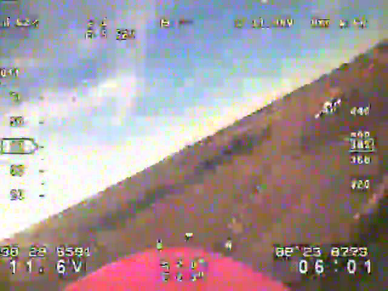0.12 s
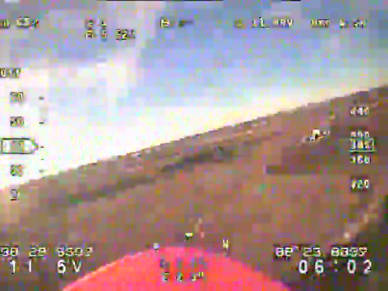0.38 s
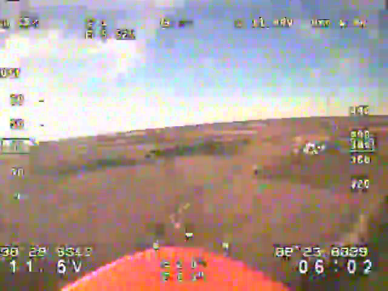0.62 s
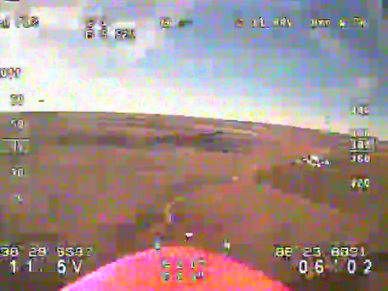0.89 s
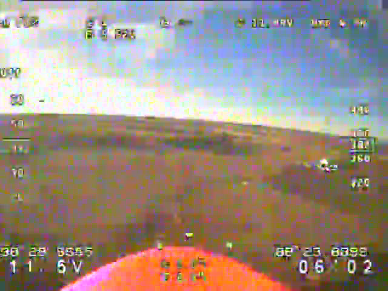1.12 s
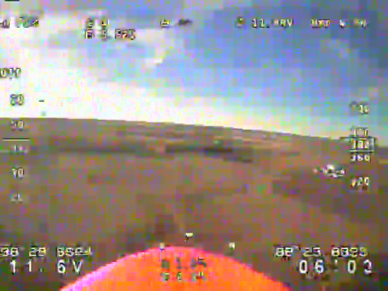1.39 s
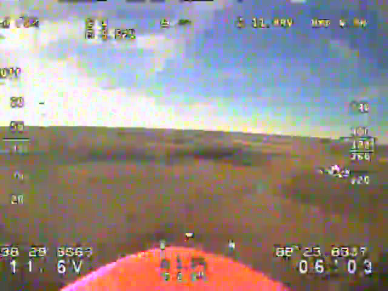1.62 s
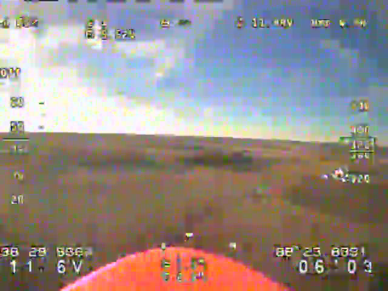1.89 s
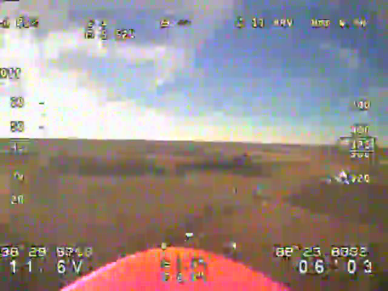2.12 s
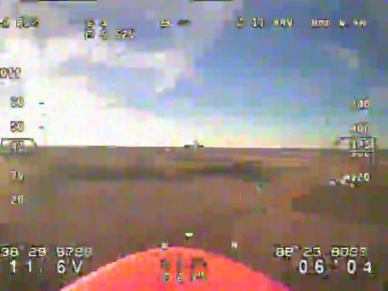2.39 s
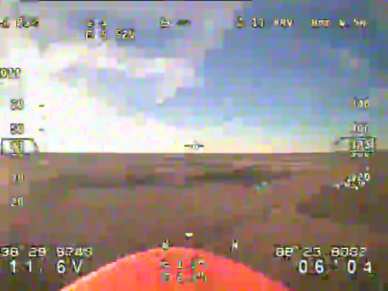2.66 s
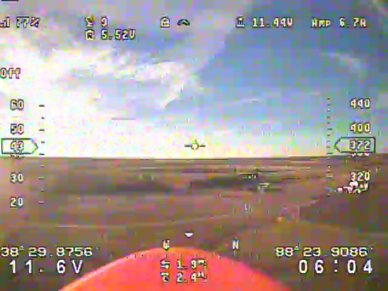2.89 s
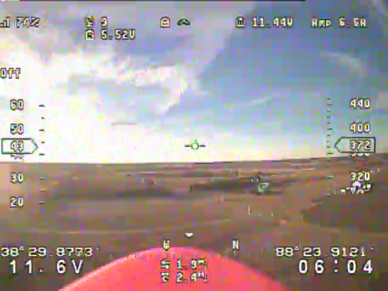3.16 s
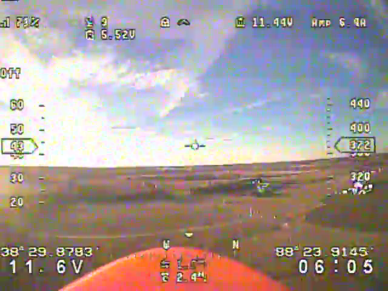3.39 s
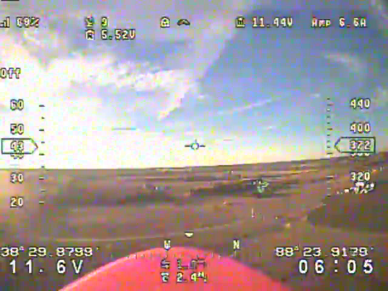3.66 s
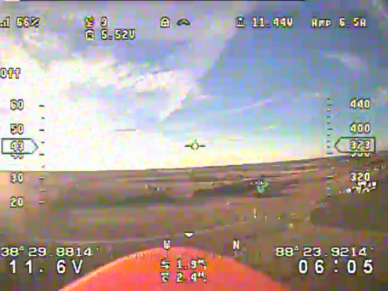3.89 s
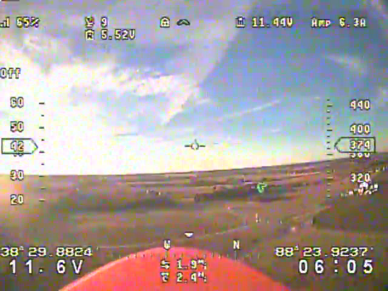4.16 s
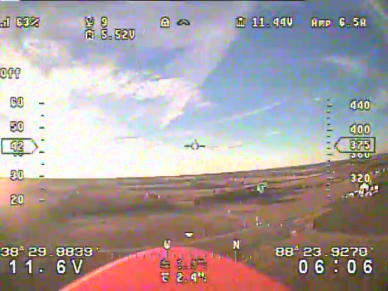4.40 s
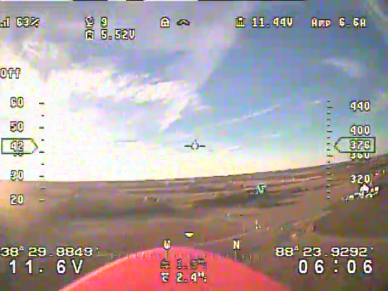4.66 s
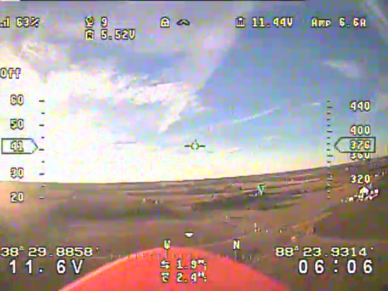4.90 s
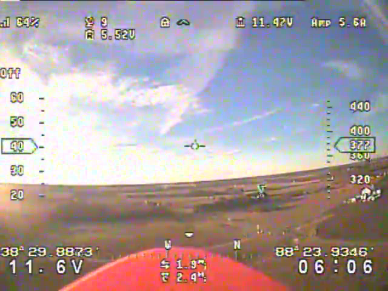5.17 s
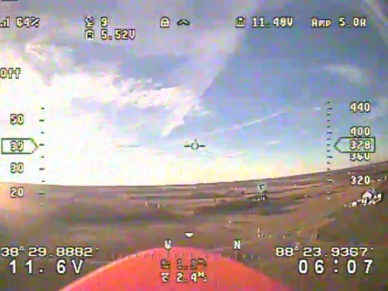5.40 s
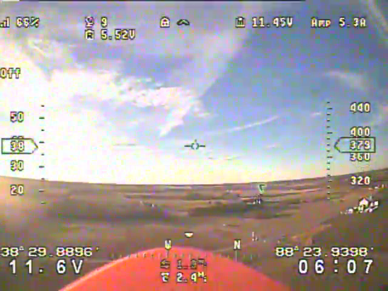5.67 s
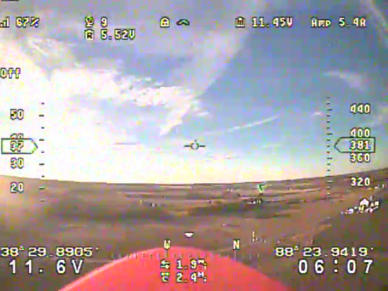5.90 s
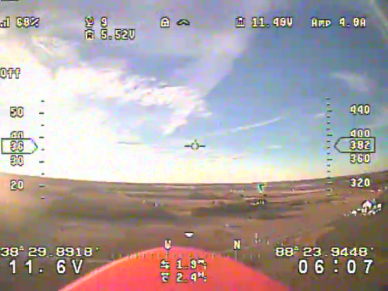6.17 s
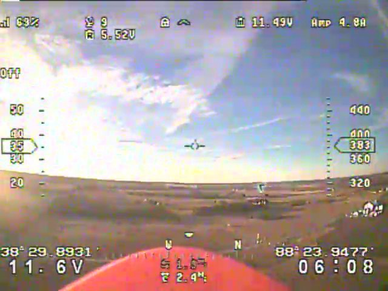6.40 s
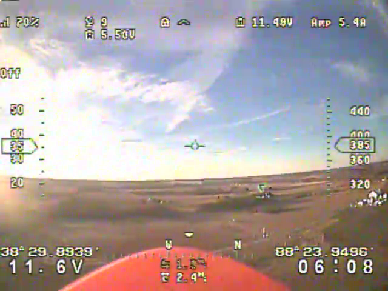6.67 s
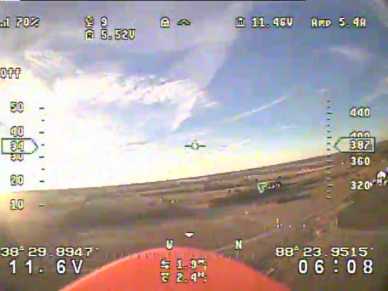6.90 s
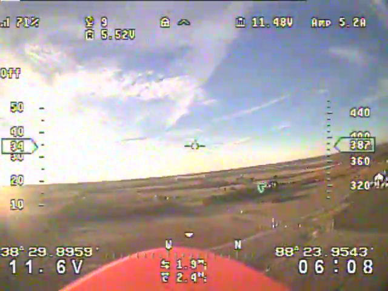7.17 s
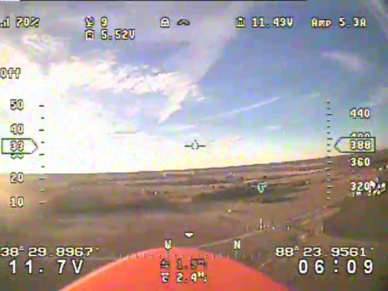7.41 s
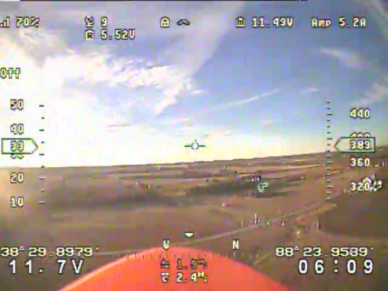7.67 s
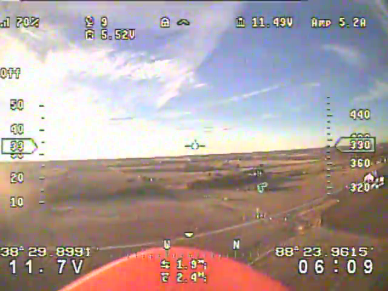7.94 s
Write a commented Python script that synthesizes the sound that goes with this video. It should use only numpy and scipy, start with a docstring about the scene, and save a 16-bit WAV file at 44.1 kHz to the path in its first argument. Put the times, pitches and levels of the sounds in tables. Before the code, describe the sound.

On board a model aircraft, a low buzzing propeller hum drops in steps amid rumbling airflow, while deep pulsing makes the lo-fi signal crackle.

```python
"""A steady propeller drone that drops in pitch twice, over buffeting wind, with a slow throb and crackle.
Place: a small electric plane in flight. Microphone: on board, in the airflow, heard over a narrow-band radio link.
The drone is a sum of harmonics of the blade rate; the wind is banded noise that gusts and flickers.
The throb is a wandering near-sine that rocks the whole signal and drives the link into its rails, where it crackles."""
import sys
import numpy as np
from scipy import signal
from scipy.io import wavfile

SR = 44100
rng = np.random.default_rng(int(sys.argv[2]) if len(sys.argv) > 2 else 0)


def level_to_linear(level):
    """Convert decibel levels to linear amplitude factors, elementwise."""
    exponent = np.asarray(level, float) / 20
    return 10 ** exponent


def dump_mix(stems):
    """Bounce the given channels to the path in sys.argv[1] as a 16-bit WAV at rate SR."""
    frames = np.atleast_2d(stems).T  # one column per channel
    limited = np.clip(frames, -1, 1)  # hard clip at full scale
    pcm = np.round(limited * 32767).astype(np.int16)
    wavfile.write(sys.argv[1], SR, pcm)


N = 355005

# Propeller speed: t/s, blade passes f/Hz
BLADE_PASSES = [(0.0, 223.0), (0.8, 223.4), (1.5, 224.6), (2.4, 224.7), (3.2, 221.7), (3.7, 220.9),
                (4.52, 220.3), (4.66, 216.5), (4.82, 204.4), (5.2, 202.4), (5.45, 204.0), (5.7, 202.0),
                (5.9, 185.5), (6.05, 193.5), (6.2, 200.1), (6.45, 200.5), (7.32, 199.2), (7.68, 199.7),
                (8.05, 199.3)]
# Upper harmonics of the blade pulse: multiple of the blade rate, level/dB at full speed, level/dB throttled back
UPPER_HARMONICS = [(3, -37.5, -45), (4, -39, -38), (5, -45, -47), (6, -41.5, -42), (7, -44, -49),
                   (8, -45, -46.5), (9, -55, -57), (10, -47.5, -47)]
# Harmonics that gain a partner one throb higher: multiple of the blade rate,
# level/dB against the throb at full speed, level/dB throttled back
ROCKED_HARMONICS = [(2, -17, -19), (4, -36, -24), (5, -40, -33)]
# Airflow on the microphone, fading as the plane slows: t/s, level/dB
MICROPHONE_AIRFLOW = [(0, 0), (0.4, -0.5), (0.8, 0.7), (1.6, 0.5), (2.8, 0.5), (3.8, -0.5), (4.5, -0.86),
                      (5.5, -2.5), (6.5, -4), (7.3, -5), (8.05, -4)]
# Relative density of the low wind buffeting: f/Hz, level/dB per Hz
BUFFET_SPECTRUM = [(27, -5), (36, -0.5), (55, -1), (100, -5.5), (200, -7), (300, -12.5), (450, -18),
                   (700, -29)]
# Relative density of the brighter wind rush: f/Hz, level/dB per Hz
RUSH_SPECTRUM = [(250, -10.5), (400, -8.5), (700, -11.5), (1200, -18.5), (2000, -22.5), (3000, -35.5),
                 (4000, -28.5), (5600, -29)]
# Swells and fades of the slow throb: t/s, level/dB
THROB_SWELLS = [(0.05, -13.5), (0.18, -26), (0.47, -6.5), (0.8, -11.5), (0.93, -20), (1.1, -15),
                (1.45, -13.5), (1.68, -25.5), (2.12, -9), (2.24, -19), (2.38, -8.5), (2.7, -11.5),
                (3.0, -20.5), (3.5, -8), (3.75, -14), (4.3, -13), (4.52, -9), (4.75, -14.5), (4.88, -11.5),
                (5.05, -15.5), (6.1, -15), (6.7, -28), (6.87, -14.5), (7.3, -19), (7.6, -10), (8.05, -12)]

FULL_HZ, BACK_HZ = 220, 204   # blade rates at full speed and throttled back
# The two lowest harmonics: level/dB at full speed, level/dB throttled back
BLADE_TONE_DB, SECOND_DB = (-12, -13.5), (-20, -29)
SECOND_DB_PER_HZ = 0.58   # the second harmonic keeps growing above full speed
BUFFET_DB, RUSH_DB = -8.5, -25.5   # where the airflow stands at 0 dB
RUSH_FOLLOWS = 1.15   # rush swing as a share of the buffet's, dB per dB
THROB_HZ, THROB_WANDER_HZ = 22.07, 1.3   # mean pitch, rms wander
THROB_FLUTTER_DB, THROB_FLUTTER_PER_S = 1.5, 6.0
LINK_RATE = 8000   # samples per s


def rms_one(x):
    """Scales a signal to an rms of 1."""
    return x / np.sqrt(np.mean(x ** 2) + 1e-20)


def in_time(rows):
    """Draws each column of a table as a line over the whole scene; the first column is t/s."""
    s, *columns = np.transpose(rows)
    return [np.interp(np.arange(N) / SR, s, c) for c in columns]


def drift(rate):
    """Slow chance of rms 1: noise through two equal one-pole low-passes with corners at rate, in Hz."""
    coarse = 40   # drawn once in this many samples, then joined by lines
    settle = 2000
    r = np.exp(-2 * np.pi * rate * coarse / SR)
    noise = rng.standard_normal(N // coarse + settle + 2)
    slow = signal.lfilter([1], [1, -2 * r, r * r], noise)[settle:]
    return np.interp(np.arange(N) / coarse, np.arange(len(slow)), rms_one(slow))


def throttle(rate):
    """Share of the way from throttled back (0) to full speed (1)."""
    return np.clip((rate - BACK_HZ) / (FULL_HZ - BACK_HZ), 0, 1)


def at_throttle(full, full_db, back_db):
    """Level in dB on the line between throttled back and full speed."""
    return back_db + full * (full_db - back_db)


def propeller(angle, rate):
    """One pressure pulse a blade pass: harmonics locked to the turning, shaken a little by turbulence."""
    full = throttle(rate)
    tone_db = at_throttle(full, *BLADE_TONE_DB)
    second_db = at_throttle(full, *SECOND_DB) + SECOND_DB_PER_HZ * np.maximum(rate - FULL_HZ, 0)
    pulse = level_to_linear(tone_db + 1.5 * drift(12)) * np.cos(angle)
    pulse = pulse + level_to_linear(second_db + 1.1 * drift(26)) * np.cos(2 * angle)
    for order, full_db, back_db in UPPER_HARMONICS:
        level_db = at_throttle(full, full_db, back_db) + 1.2 * drift(4)
        pulse = pulse - level_to_linear(level_db) * np.cos(order * angle)
    return np.sqrt(2) * pulse   # levels are rms


def banded_noise(spectrum, gust_rate, gust_db, flicker_db):
    """Half-octave bands of noise that share gusts and flicker on their own; rms 1."""
    hz, level_db = np.transpose(spectrum)
    edges = hz[0] * 2 ** np.arange(0, np.log2(hz[-1] / hz[0]) + .5, .5)
    gust = drift(gust_rate)
    white = rng.standard_normal((2, N))   # neighbouring bands take different noise
    out = 0
    for k, (low, high) in enumerate(zip(edges, edges[1:])):
        band_pass = signal.butter(2, [low, high], "band", fs=SR, output="sos")
        band = signal.sosfilt(band_pass, white[k % 2])
        centre_db = np.interp(np.log(low * high) / 2, np.log(hz), level_db)
        out = out + band * level_to_linear(centre_db + gust_db * gust + flicker_db * drift(7.4))
    return rms_one(out)


def wind(angle):
    """Turbulent air at the microphone: low buffeting plus a brighter rush that the passing blades chop."""
    flow_db, = in_time(MICROPHONE_AIRFLOW)
    buffet = banded_noise(BUFFET_SPECTRUM, gust_rate=14.0, gust_db=0.72, flicker_db=0.16)
    rush = banded_noise(RUSH_SPECTRUM, gust_rate=290.0, gust_db=2.0, flicker_db=0.28)
    chop = level_to_linear(-1.2 * np.sin(angle))
    buffet = level_to_linear(BUFFET_DB + flow_db) * buffet
    return buffet + level_to_linear(RUSH_DB + RUSH_FOLLOWS * flow_db) * rush * chop


def throb():
    """A near-sine at the bottom of hearing whose pitch and strength wander: (height, angle)."""
    level_db, = in_time(THROB_SWELLS)
    flutter_db = THROB_FLUTTER_DB * drift(THROB_FLUTTER_PER_S)
    hz = THROB_HZ + THROB_WANDER_HZ * drift(3)
    return np.sqrt(2) * level_to_linear(level_db + flutter_db), 2 * np.pi * np.cumsum(hz) / SR


def rocked_partners(angle, rate, height, swing):
    """The throb rocks some blade harmonics, which adds a tone one throb higher that rises and falls with it."""
    full = throttle(rate)
    tones = 0
    for order, full_db, back_db in ROCKED_HARMONICS:
        tones = tones + level_to_linear(at_throttle(full, full_db, back_db)) * np.cos(order * angle + swing)
    return height * tones


def capsule(pressure):
    """The microphone capsule squares off the loudest pressure swings."""
    headroom = .75
    return headroom * np.tanh(pressure / headroom)


def scene():
    """Propeller, wind and rocked partners pass the capsule; the throb then rocks the whole signal."""
    rate, = in_time(BLADE_PASSES)
    angle = 2 * np.pi * np.cumsum(rate + .3 * drift(12)) / SR   # the turning is slightly unsteady
    drone = propeller(angle, rate) + wind(angle)
    height, swing = throb()
    partners = rocked_partners(angle, rate, height, swing)
    return (capsule(drone + partners) + height * np.sin(swing))[None]


def lopsided(dry):
    """Uneven bending in the link: crests are eased, deep troughs plunge towards the rail."""
    offset, ease = .051, .067
    knee, plunge = .5, 22
    lifted = dry + offset
    eased = lifted - ease * np.clip(lifted, 0, 1) ** 2
    return eased - plunge * np.maximum(-knee - lifted, 0) ** 2.5


def low_pass(x):
    """Removes everything above the highest recorded frequency."""
    return signal.sosfilt(signal.butter(12, 15870, fs=SR, output="sos"), x)


def record(dry):
    """The radio link: bent, sampled at a low rate, clipped at its rails, smoothed and clipped once more."""
    rail, top = .7075, .704
    down, up = SR // 100, LINK_RATE // 100
    # a loose filter ahead of the sampling, cut at 4800 Hz
    loose = signal.firwin(6 * down + 1, 4800, fs=SR * up)
    samples = signal.resample_poly(lopsided(dry), up, down, axis=1, window=loose)
    samples = np.clip(samples, -rail, top)
    smooth = signal.firwin(32 * down + 1, 3980, window=("kaiser", 9), fs=SR * up)
    raised = signal.resample_poly(samples, down, up, axis=1, window=smooth, padtype="edge")[:, :N]
    # smoothing ripples at the clipped corners; clipping the ripple ticks above the band edge
    clipped = np.clip(raised, -rail, rail)
    step = rail / 2 ** 15
    stored = step * np.round(clipped / step)   # 16-bit rounding leaves a faint hiss
    return low_pass(stored)


dry = scene()
out = record(dry)
dump_mix(out)
```